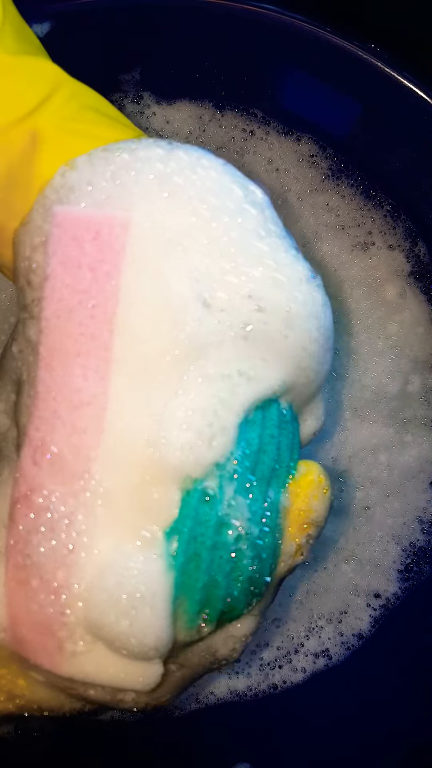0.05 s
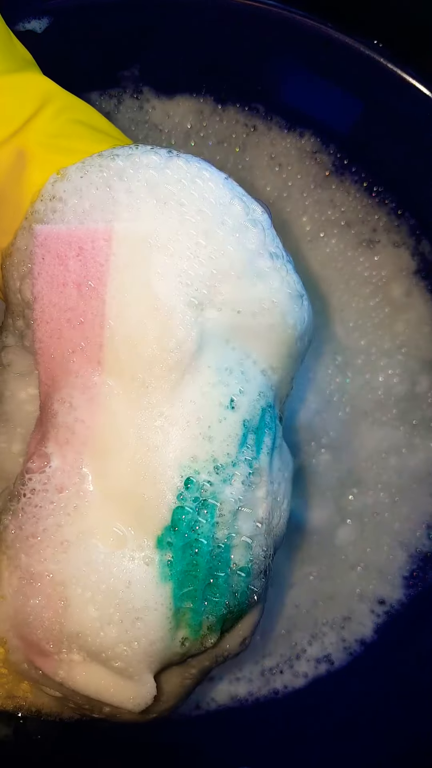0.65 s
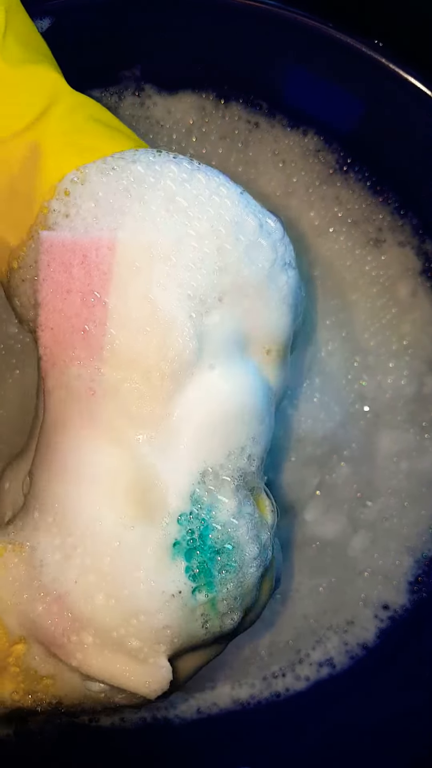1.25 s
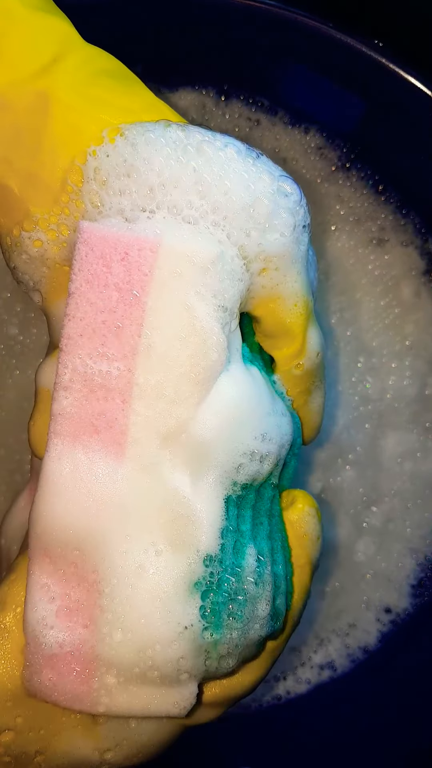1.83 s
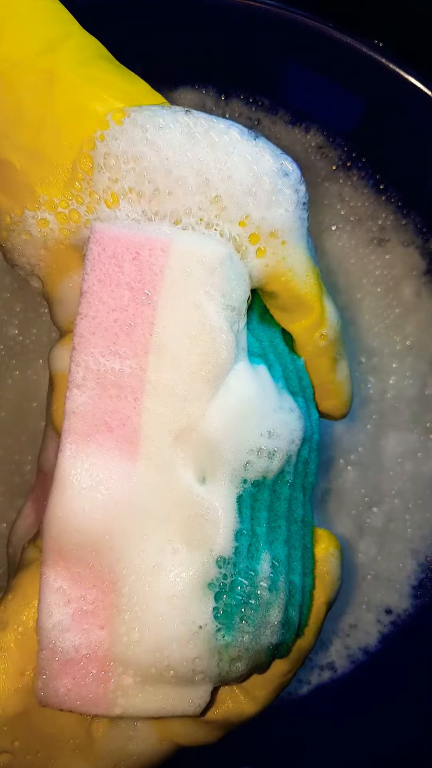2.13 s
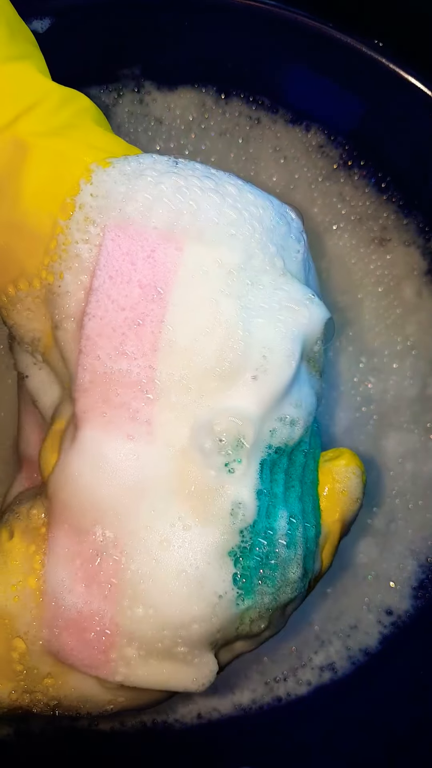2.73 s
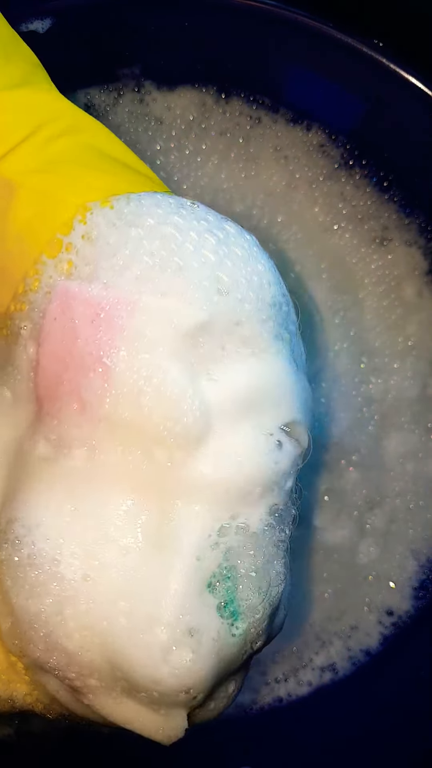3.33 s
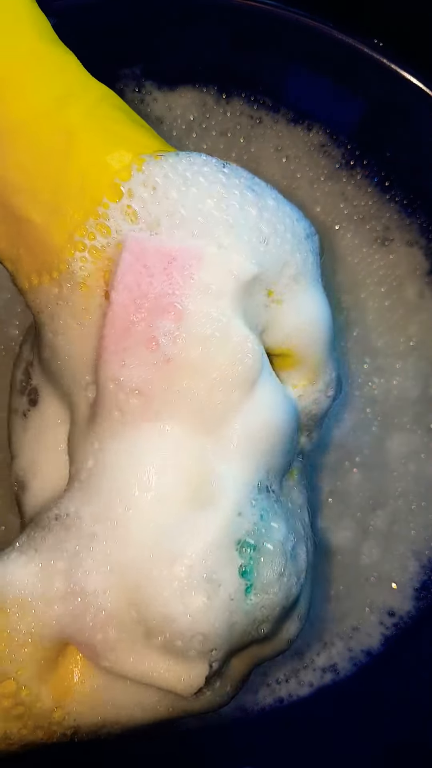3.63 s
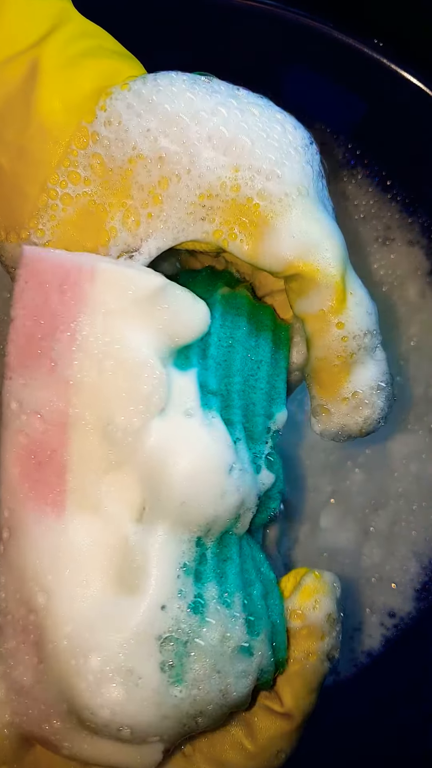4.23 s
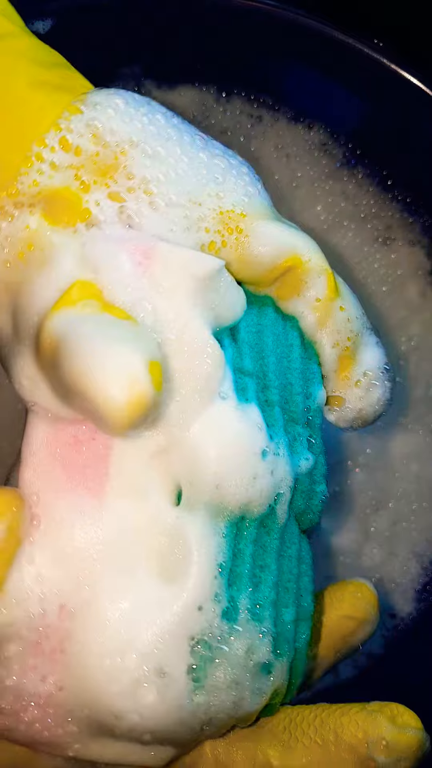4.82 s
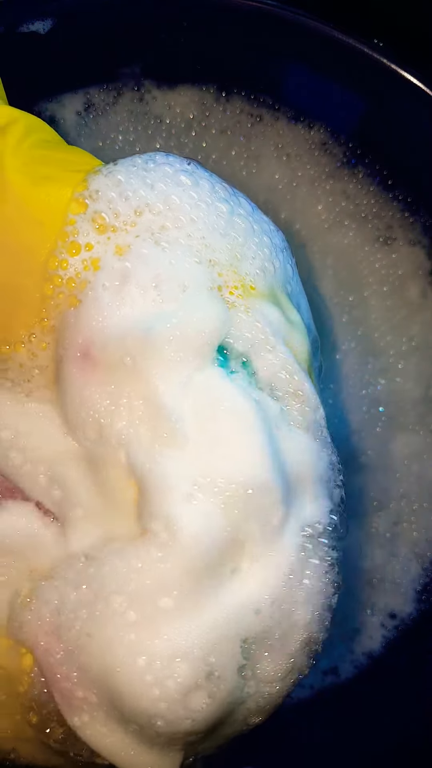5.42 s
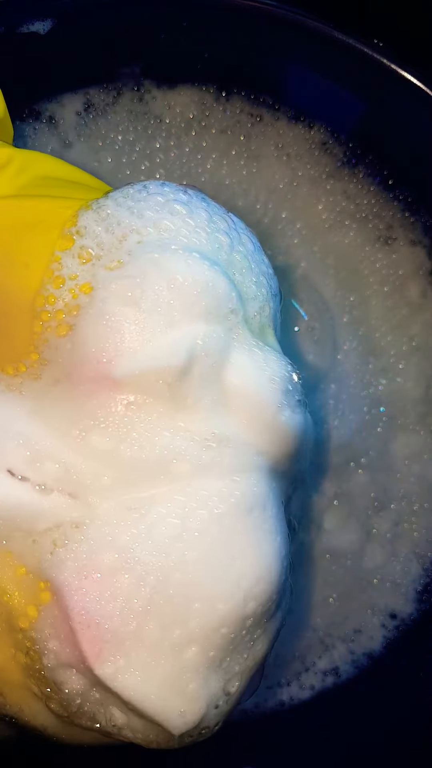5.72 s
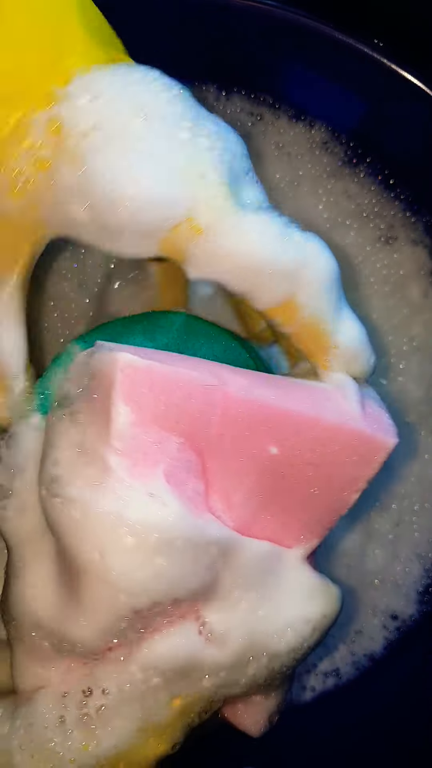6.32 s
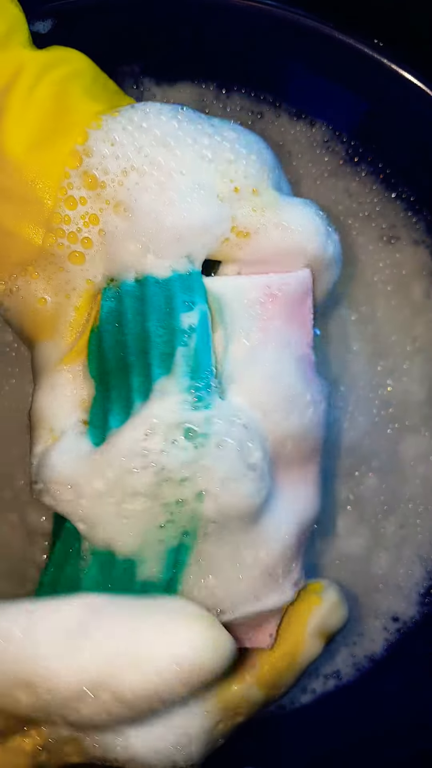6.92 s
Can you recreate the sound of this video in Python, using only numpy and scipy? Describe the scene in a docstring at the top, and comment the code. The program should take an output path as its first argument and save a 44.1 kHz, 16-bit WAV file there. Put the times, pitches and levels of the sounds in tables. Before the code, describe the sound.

Wet sponges squish and gurgle over a basin as suds fizz and crackle, and an air pocket pops loudly once.

```python
"""Low gurgles, a wet squelch and fizzing foam swell and sink, dotted with single glugs and bubble ticks.
Gloved hands are kneading soapy sponges over a basin, close to the microphone, in a small hard-walled
room. Each squeeze drives suds through the pores, where countless bubbles ring for an instant.
Once, a pocket of trapped air bursts with a sharp smack that sets the room ringing."""
import sys
import numpy as np
from scipy import signal
from scipy.fft import rfft, irfft, next_fast_len
from scipy.io import wavfile

SR = 44100
rng = np.random.default_rng(int(sys.argv[2]) if len(sys.argv) > 2 else 0)


def transcribe(u):
    """Save the signal u as a 16-bit wav file named by the first command-line argument.

    u: samples, shape (n,) or (channels, n), limited to [-1, 1]; the rate is SR.
    q: integer samples, one column per channel.
    """
    v = np.clip(np.atleast_2d(u).T, -1, 1)
    q = np.round(v * 32767).astype(np.int16)
    wavfile.write(sys.argv[1], SR, q)


N = 311346
SMACK_S, TOP_HZ = 5.2470, 15850

# tone of the fizz, including the microphone's colour: (frequency [Hz], level [dB])
FIZZ_EQ = [(1500, -17.5), (3000, -2), (4500, -4.5), (7200, -4), (8300, -13), (9600, -15), (11500, -8),
           (13000, -7.5), (15800, -14.5)]
# tone of a bubble tick, including the microphone's colour: (frequency [Hz], level [dB])
TICK_EQ = [(600, -28), (1500, 9), (3000, 2), (6800, 0.5), (8300, -11.5), (9600, -15), (12500, -3.5),
           (15800, -16)]


def amp(db):
    """Decibels to gain."""
    return 10 ** (np.asarray(db) / 20)


def unit(x):
    """Scale to rms 1."""
    return x / np.sqrt(np.mean(x ** 2) + 1e-20)


def along(points, hz):
    """Read a curve of (frequency [Hz], value) points on a log frequency axis."""
    f, v = np.transpose(points)
    return np.interp(np.log(hz + 1), np.log(f + 1), v)


def filtered(x, response):
    """Zero-phase filter with the gain response(hz)."""
    n = x.shape[-1]
    m = next_fast_len(n + 8192)
    return irfft(rfft(x, m) * response(np.fft.rfftfreq(m, 1 / SR)), m)[..., :n]


def coloured(x, eq):
    """Minimum-phase EQ through (frequency [Hz], level [dB]) points."""
    size = 4096
    gain = amp(along(eq, np.fft.rfftfreq(size, 1 / SR)))
    cepstrum = irfft(np.log(gain))
    fold = 1 + np.sign(size // 2 - np.arange(size))
    fold[0] = 1
    kernel = irfft(np.exp(rfft(cepstrum * fold)))
    return signal.fftconvolve(x, kernel[None], axes=1)[:, :x.shape[1]]


def fade(t, t60):
    """Exponential decay that starts at t = 0."""
    return (t >= 0) * np.exp(-np.log(1000) * np.abs(t) / np.maximum(t60, 1e-4))


def add(track, s, sound):
    """Mix a sound into a track at s seconds."""
    part = track[:, max(round(s * SR), 0):][:, :sound.shape[-1]]
    part += sound[..., :part.shape[1]]


def diffuse(size):
    """Stereo noise from all directions: alike in the bass, unrelated in the treble."""
    # likeness of left and right: (frequency [Hz], correlation [0-1])
    likeness = [(120, 0.88), (300, 0.78), (640, 0.38), (1400, 0.048), (4000, 0.1), (15000, 0)]

    def mid_side_gains(hz):
        angle = np.arccos(np.clip(along(likeness, hz), -1, 1)) / 2
        return np.array([np.cos(angle), np.sin(angle)])

    mid, side = filtered(rng.standard_normal((2, size)), mid_side_gains)
    return np.array([mid + side, mid - side])


def room_tone():
    """A faint, bass-heavy bed of noise."""
    # tone of the quiet room: (frequency [Hz], level [dB])
    floor_eq = [(20, -1.5), (50, -5), (85, -24), (120, 3.5), (300, -10), (700, -13), (1050, -17.5),
                (1650, -8), (2500, -19.5), (5000, -38), (9300, -37), (13000, -28.5), (15800, -26)]
    return amp(-62.0) * unit(coloured(diffuse(N), floor_eq))


def room_tail():
    """Reverb of the hard walls: a stereo impulse response, energy about 1 a side."""
    # decay of the room: (frequency [Hz], t60 [s])
    decay = [(150, 0.86), (600, 1), (1500, 0.76), (3000, 0.52), (6000, 0.45), (13000, 0.51)]
    hz, t, bands = signal.stft(diffuse(SR), SR, nperseg=256)
    bands = bands * fade(t, along(decay, hz)[:, None])
    tail = signal.istft(bands, SR, nperseg=256)[1][:, :SR]
    return unit(tail) / np.sqrt(SR)


def standing_waves():
    """The low ring of the room after a sudden kick."""
    # room modes: (frequency [Hz], relative level [dB], t60 [s])
    modes = [(65.4, -66, 0.81), (119, -26, 0.8), (189.3, -46.5, 2.5), (310, -32.5, 0.39),
             (559, -41.5, 0.89), (601, -40.5, 0.91)]
    t = np.arange(SR) / SR
    ring = sum(amp(db) * np.sin(2 * np.pi * hz * t) * fade(t, t60) for hz, db, t60 in modes)
    return ring * (1 - np.exp(-t / 0.0098))


def low_rumble(flow_db):
    """A dull, low room rumble swells as the hands press more water out."""
    rumble = unit(filtered(diffuse(N), lambda hz: np.exp(-((hz - 58) / 16) ** 2)))
    return amp(-66.5 + 0.4 * (flow_db - flow_db.mean())) * rumble


def bubbles(pitch_hz, spread, cycles, scatter_db, lag_ms, width_ms, pan_db, count, size):
    """A steady cloud of damped bubble rings, each reaching left and right at its own times."""
    start = rng.integers(0, N, (count, 1))
    samples = (start + np.arange(size)).ravel()
    pitch, loud, place, pan = rng.standard_normal((4, count, 1))
    hz = np.minimum(pitch_hz * np.exp(spread * pitch), TOP_HZ)
    gain = amp(scatter_db * np.minimum(loud, 2)) * np.sqrt(hz)
    out = []
    for side in (-1, 1):
        t = (np.arange(size) - size // 8) / SR - side * (lag_ms + width_ms * place) / 2000
        ring = gain * amp(side * pan_db * pan / 2) * np.sin(2 * np.pi * hz * t) * fade(t, cycles / hz)
        out.append(np.bincount(samples, ring.ravel(), N + size)[:N])
    return unit(np.array(out))


def lather(fizz_db, growth_db_per_s=3):
    """The finest foam hisses more as the suds are worked up; the smack throws off a short spray."""
    t = np.arange(N) / SR
    mist = bubbles(pitch_hz=12000, spread=.15, cycles=4.5, scatter_db=1.5,
                   lag_ms=0.034, width_ms=.2, pan_db=0, count=20000, size=48)
    worked_db = -79 + 0.34 * (fizz_db - fizz_db.mean()) + growth_db_per_s * (t - t.mean())
    spray = amp(-54.5) * fade(t - SMACK_S, .35)
    return (amp(worked_db) + spray) * unit(coloured(mist, FIZZ_EQ))


def ticks(small_count, fresh_foam_s=(0.31, 1.9)):
    """Surface bubbles burst with tiny clicks, each setting off a few weaker neighbours."""
    # big bubbles bursting on top of the foam: (time [s], relative level [dB])
    big = [(0.3904, -46), (0.4454, -46), (0.5377, -46.5), (0.6255, -46), (0.8284, -49.5), (0.9832, -49),
           (1.4805, -48), (1.5075, -42.5), (1.7749, -48), (1.8422, -45), (3.8214, -48)]
    # small ones burst by chance while the foam is fresh
    small = list(zip(rng.uniform(*fresh_foam_s, small_count), rng.normal(-57.5, 7, small_count)))
    out, t = np.zeros((2, N)), np.arange(SR // 100) / SR
    sides = np.array([[1], [-1]])
    for s, db in big + small:
        delays = np.append(0, rng.exponential(0.011, size=4))
        weaker_db = np.append(0, rng.normal(-8, 1.4, size=4))
        for delay, drop_db, pan in zip(delays, weaker_db, rng.standard_normal(size=5)):
            click = (t == 0) + 0.2 * rng.standard_normal((2, len(t))) * fade(t, 0.0048)
            add(out, s + delay, amp(db + drop_db + 9.0 + 2 * pan * sides) * click)
    return coloured(out, TICK_EQ)


def small_gulps(flow_db, count):
    """Cues for chance glugs, more frequent and louder the more water flows."""
    drained = np.cumsum(amp(flow_db))
    at = np.searchsorted(drained, drained[-1] * (np.arange(count) + rng.random(count)) / count)
    ring_db = flow_db[at] + 14.5
    splutter_db = ring_db - 21
    hz = 600 * np.exp(0.46 * rng.standard_normal(count))
    return list(zip(at / SR, ring_db, hz, splutter_db))


def glugs(flow_db, small_count):
    """A gulp of air rings briefly in the damp sponge, spits suds and breaks into smaller bubbles."""
    # big gulps: (time [s], relative ring level [dB], starting pitch [Hz], relative splutter level [dB])
    big_gulps = [(1.2825, -41, 396, -50), (1.3466, -30, 306, -55), (1.3609, -40, 400, -45),
                 (1.669, -36, 1280, -46.5), (2.359, -37, 840, -47), (2.4016, -34.5, 1950, -57),
                 (3.6005, -37, 960, -49), (3.7965, -41, 720, -50), (3.817, -28.5, 474, -42),
                 (3.9026, -33, 500, -47), (3.9320, -31, 564, -42.5), (4.144, -35.5, 600, -55),
                 (4.842, -44, 1080, -55), (5.9282, -37, 770, -39), (5.9575, -28, 940, -46),
                 (5.9695, -39, 715, -37.5), (5.975, -23.5, 388, -36), (6.0512, -28.5, 400, -45),
                 (6.0960, -22.5, 540, -34), (6.1059, -27, 650, -39.5), (6.346, -36, 750, -54),
                 (6.724, -42, 900, -46.5)]
    # tone of spitting suds: (frequency [Hz], level [dB])
    splutter_eq = [(200, -13), (700, 0), (2100, 0), (3200, -10), (4500, -18), (7000, -22), (9000, -35)]
    out, t = np.zeros((2, N)), np.arange(SR // 10) / SR
    for s, db, hz, splutter_db in big_gulps + small_gulps(flow_db, small_count):
        rising_tone = np.sin(2 * np.pi * hz * t * (1 + 8 * t))
        ring = rising_tone * fade(t, 5.3 / hz) * (1 - np.exp(-t * hz / 0.31))
        spit = unit(coloured(diffuse(len(t)), splutter_eq))
        spit *= fade(t, 0.025) + amp(-8.0) * fade(t, 0.14)
        # the offspring are mostly higher, start a little later and land left or right
        delay = rng.exponential(.005, size=(8, 1))
        pitch, pan = rng.standard_normal(size=(2, 8, 1))
        small_hz = np.clip(1.86 * hz * np.exp(.4 * pitch), 300, 2600)
        small = np.sin(2 * np.pi * small_hz * (t - delay)) * fade(t - delay, 10 / small_hz)
        offspring = amp(1.8 * np.hstack([pan, -pan])).T @ small
        splutter = amp(splutter_db - 5.0) * spit + amp(splutter_db - 5.5) * offspring
        add(out, s, amp(db + 2.5) * ring + splutter)
    # so small a source radiates little bass
    return coloured(out, [(60, -24), (230, -1.0)])


def smack():
    """The air pocket cracks open to the right; near surfaces answer, then the whole room."""
    # resonances of the bursting pocket: (frequency [Hz], relative level [dB], t60 [s])
    pocket_modes = [(310, -45, 0.051), (593, -20.5, 0.066), (1800, -7, 0.017), (2590, -3, 0.01),
                    (3950, -10.5, 0.008), (5790, 8, 0.0027)]
    # tone of the direct crack: (frequency [Hz], level [dB])
    crack_eq = [(1000, 2.5), (6300, 2), (7500, 1), (8800, -2), (12500, -10), (15800, -15)]
    # tone of its reflections: (frequency [Hz], level [dB])
    reflection_eq = [(60, -49.5), (110, -6.5), (200, -17), (330, -3.5), (430, -11.5), (600, -7.5),
                     (1050, -9), (2500, -5.5), (4200, -10), (6000, -13.5), (7400, -23), (8800, -36),
                     (12500, -40.5), (15800, -46)]
    out, t = np.zeros((2, N)), np.arange(SR) / SR
    age = t - np.array([[.00025], [0]])  # the left side hears it later
    ring = sum(amp(db) * np.sin(2 * np.pi * hz * age) * fade(age, t60) for hz, db, t60 in pocket_modes)
    attack = 1 - np.exp(-np.abs(age) / 0.00039)
    crack = coloured(-ring * attack, crack_eq) * amp([[-2], [.5]])
    near = amp(-14.5) * unit(coloured(diffuse(SR), reflection_eq)) * fade(t, 0.052)
    tail = amp(-36.5) * unit(coloured(room_tail(), reflection_eq))
    add(out, SMACK_S, crack + (near + tail) * (1 - np.exp(-t / 0.00029)) + standing_waves())
    # the nearest wall throws the crack back
    add(out, SMACK_S + 0.012, amp(-10.5) * crack)
    return out


def flow(swing_db=20, roundness=1.4):
    """Gurgle, squelch and fizz envelopes in dB: each squeeze swells, lingers at its hardest and sinks."""
    # squeezes of the sponge: (hardest moment [s], build-up [s], release [s], relative squelch
    # level [dB], gurgle offset [dB], fizz offset [dB])
    squeezes = [(0.48, .2, 0.36, -67, -1, -10.5), (1.042, .32, 0.078, -62.5, 6, -8),
                (1.349, .16, .16, -61.5, 12, -6.5), (1.509, .16, .14, -59, -3.5, -6.5),
                (1.68, .08, .2, -60, 7, -2.5), (2.318, .25, .13, -57, 0, -7.5),
                (2.68, .22, .25, -52.5, 2.5, -4), (2.89, .28, .16, -42, -2.5, -10),
                (3.10, 0.14, .22, -56.5, 3.5, -15), (3.32, .2, .2, -62, 9, -18.5),
                (3.619, .06, 0.18, -54.5, 2, -12), (3.83, .22, .3, -56, 7, -9),
                (4.329, .16, .14, -61.5, 4, -7.5), (4.51, .15, .1, -53, 0.5, -8),
                (4.729, .13, 0.091, -54.5, -3, -7), (5.20, .46, .3, -48.5, -1.5, -5),
                (5.69, .32, 0.14, -50.5, 0.5, -15), (5.999, .11, .16, -48, 3, -11),
                (6.189, .16, .16, -51.5, 0, -9.5), (6.42, .18, .3, -57.5, 0, -3.5),
                (6.74, .12, .22, -51.5, -0.5, -11), (7.02, .26, .4, -55.5, 1.5, -8.5)]
    t = np.arange(N) / SR
    seep_db = [[-63.5], [-68.5], [-75.5]]  # suds keep seeping between squeezes
    power = amp(seep_db) ** 2 * np.ones(N)
    for s, build_s, release_s, db, gurgle_db, fizz_db in squeezes:
        slack = np.maximum((s - t) / build_s, (t - s) / release_s)
        swell = amp(-swing_db * np.minimum(slack, 10) ** roundness)
        power += (amp([[db + gurgle_db], [db], [db + fizz_db]]) * swell) ** 2
    return 10 * np.log10(power)


def kneading(gurgle_db, squelch_db, fizz_db):
    """Big bubbles gurgle in the sponge, small ones squelch through its pores, tiny ones fizz on top."""
    # tone of the gurgle: (frequency [Hz], level [dB])
    gurgle_eq = [(40, -8), (85, -12.5), (120, 1), (300, 3.5), (600, 0), (1200, 1.5), (3000, -25.5)]
    # tone of the squelch: (frequency [Hz], level [dB])
    squelch_eq = [(250, -8), (550, 2), (950, -4.5), (1500, 0.5), (2600, -2), (4000, -5), (7200, -8.5),
                  (8500, -19), (15000, -22)]
    gurgle = bubbles(pitch_hz=269, spread=0.45, cycles=3.85, scatter_db=1.5,
                     lag_ms=0, width_ms=0.15, pan_db=2.5, count=2000, size=1100)
    squelch = bubbles(pitch_hz=1584, spread=0.65, cycles=9.8, scatter_db=-0.5,
                      lag_ms=0.084, width_ms=0.092, pan_db=3.5, count=16000, size=180)
    fizz = bubbles(pitch_hz=6960, spread=0.77, cycles=1.18, scatter_db=-2.0,
                   lag_ms=0.033, width_ms=0.087, pan_db=6.0, count=30000, size=48)
    crackle = bubbles(pitch_hz=3800, spread=1.0, cycles=4.3, scatter_db=0,
                      lag_ms=0.034, width_ms=0.078, pan_db=7.5, count=1100, size=120)
    low = amp(gurgle_db - 2.0) * unit(coloured(gurgle, gurgle_eq))
    middle = amp(squelch_db - 1.5) * unit(coloured(squelch, squelch_eq))
    high = amp(fizz_db) * unit(coloured(fizz, FIZZ_EQ))
    # separate crackles stand out under gentle pressure and drown in the fizz of a hard squeeze
    sparse = amp(0.71 * fizz_db - 30.5) * unit(coloured(crackle, TICK_EQ))
    return low + middle + high + sparse


def scene():
    """The hands up close, their faint reverb, the room tone and the smack."""
    gurgle_db, squelch_db, fizz_db = flow()
    hands = (kneading(gurgle_db, squelch_db, fizz_db) + glugs(gurgle_db, small_count=24)
             + ticks(small_count=18) + low_rumble(gurgle_db) + lather(fizz_db))
    # the left side faces the foam and catches more treble: (frequency [Hz], left minus right [dB])
    lean = [(300, 0.14), (1300, 1.6), (2500, 0.38), (7000, 2.2), (13000, 9.7)]
    hands = filtered(hands, lambda hz: amp(np.array([[.5], [-.5]]) * along(lean, hz)))
    room = amp(-10.0) * room_tail() + amp(-36.0) * standing_waves()
    reverb = signal.fftconvolve(hands, room, axes=1)[:, :N]
    return hands + reverb + room_tone() + smack()


def record(dry):
    """Peaks round off at full scale; everything above TOP_HZ is cut."""
    rounded = dry / (1 + np.abs(dry) ** 6) ** (1 / 6)
    return filtered(rounded, lambda hz: hz < TOP_HZ)


dry = scene()
out = record(dry)
transcribe(out)
```